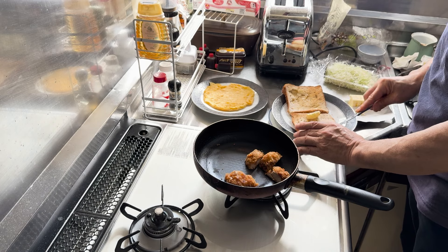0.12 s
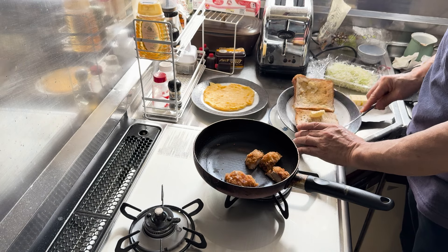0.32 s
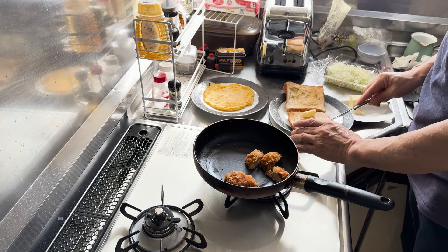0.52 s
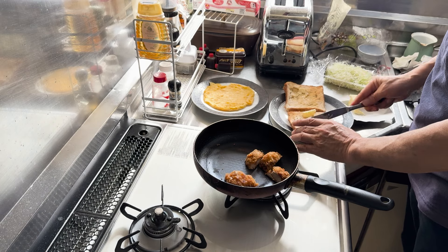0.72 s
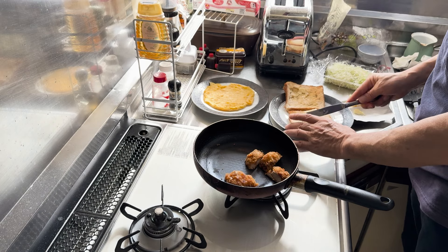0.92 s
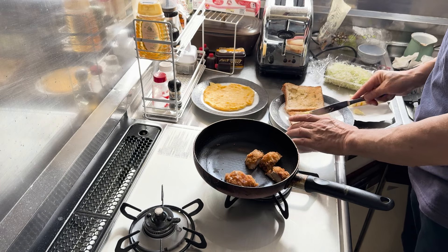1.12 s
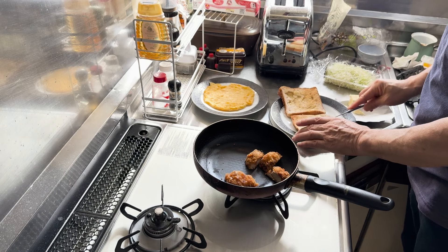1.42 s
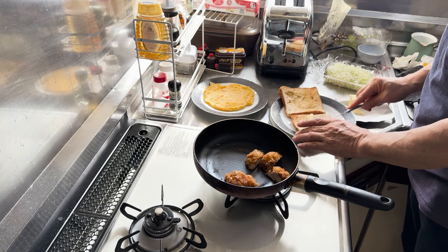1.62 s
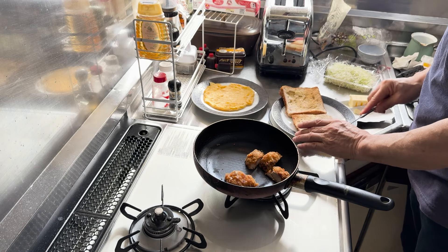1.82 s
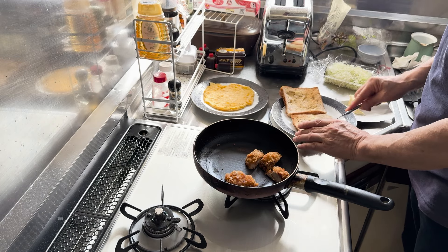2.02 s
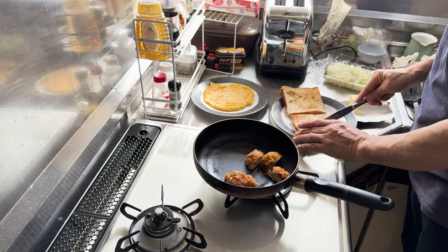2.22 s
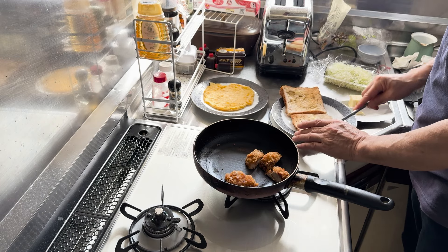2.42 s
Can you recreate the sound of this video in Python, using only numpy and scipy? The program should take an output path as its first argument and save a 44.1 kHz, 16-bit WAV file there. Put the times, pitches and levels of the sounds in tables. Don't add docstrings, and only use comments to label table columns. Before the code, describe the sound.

Crunchy knife cut through dry toast with a plate thud, followed by faint scratchy scrapes and taps

```python
import sys
import numpy as np
from scipy import signal
from scipy.fft import rfft, irfft, next_fast_len
from scipy.io import wavfile
from scipy.ndimage import uniform_filter1d

SR = 44100
rng = np.random.default_rng(int(sys.argv[2]) if len(sys.argv) > 2 else 0)


def wav_out(sig):
    wavfile.write(sys.argv[1], SR, np.round(np.clip(np.atleast_2d(sig).T, -1, 1) * 32767).astype(np.int16))


def volts_from_decibels(level):
    exponent = np.asarray(level, float) / 20
    return 10 ** exponent


N = 114660


def unit(x):
    return x / np.sqrt(np.mean(x ** 2) + 1e-30)


def curve(table, hz):
    a = np.array(table, float)
    return np.interp(np.log(hz + 1), np.log(a[:, 0] + 1), a[:, 1])


def add(out, x, start_s):
    i = max(int(start_s * SR), 0)
    out[i:i + len(x)] += x[:N - i]


def filtered(x, order, hz, kind="low"):
    return signal.lfilter(*signal.butter(order, hz, kind, fs=SR), x)


def peak(x, hz, q):
    return signal.lfilter(*signal.iirpeak(hz, q, fs=SR), x)


def ring(x, hz, t60_s):
    r = np.exp(-np.log(1000) / (max(t60_s, .002) * SR))
    w = 2 * np.pi * hz / SR
    return signal.lfilter([0, np.sin(w)], [1, -2 * r * np.cos(w), r * r], x)


def cracks(per_s, spread_db):
    on = rng.random(N) < per_s / SR
    sign = rng.choice([-1, 1], N)
    size_db = spread_db * np.minimum(rng.exponential(size=N), 3)
    return unit(on * sign * volts_from_decibels(size_db))


# (frequency [Hz], density [dB per Hz])
RUMBLE = [(15, -29), (25, -1.5), (87, -0.5), (190, -15.5), (317, -15), (450, -23.5), (4740, -47),
          (12500, -48.5), (16000, -76)]
# (frequency [Hz], level [dB])
MOTOR_LINES = [(245, -69), (295, -68)]


def hum():
    level_db, sway_db, sway_samples = -54.5, 2.0, 5000
    hz, t, out = np.fft.rfftfreq(N, 1 / SR), np.arange(N) / SR, 0
    for centre_hz in 30 * 2. ** np.arange(10):
        octaves = np.clip(np.log2((hz + 1) / centre_hz), -1, 1)
        shape = volts_from_decibels(curve(RUMBLE, hz)) * np.cos(np.pi / 2 * octaves)
        mid, side = irfft(rfft(rng.standard_normal((2, N))) * shape, N)
        drift = uniform_filter1d(rng.standard_normal(N), size=sway_samples)
        drift = uniform_filter1d(drift, size=sway_samples)
        width = min(centre_hz / 600, 1)
        out = out + volts_from_decibels(sway_db * unit(drift)) * (mid + width * side * np.array([[1], [-1]]))
    lines = sum(volts_from_decibels(db) * np.sqrt(2) * np.sin(2 * np.pi * f * t) for f, db in MOTOR_LINES)
    return volts_from_decibels(level_db) * unit(out) + lines


# (time [s], rise [s], hold [s], fall [s], level [dB])
DRAGS = [(0., 0.00071, 0.09, 0.052, -63), (0.11, 0.038, 0.05, 0.079, -55),
         (0.845, 0.012, 0.073, 0.019, -66.5), (0.989, 0.035, 0.024, 0.045, -65),
         (1.073, 0.073, 0.064, 0.066, -61.5), (1.343, .003, 0.09, 0.0095, -56.5),
         (1.605, 0.0047, 0.0091, 0.0073, -69), (1.687, .05, 0.013, .02, -59),
         (1.747, 0.0047, 0.013, 0.029, -42.5), (2.432, 0.043, 0.028, 0.013, -56),
         (2.589, 0.0091, 0.021, 0.013, -59.5)]
# (frequency [Hz], width [Hz], level [dB])
EDGE_MODES = [(3660, 70, -0.5), (6000, 200, -4), (6900, 180, -8.5), (8200, 160, -5.5), (12700, 170, 0),
              (13700, 180, -13)]


def scrapes():
    per_s, spread_db, rough_db, low_hz = 30000, 2, 1.2, 3000
    t, env = np.arange(N) / SR, np.zeros(N)
    for s, rise, hold, fall, db in DRAGS:
        swell = np.clip((t - s) / rise, 0, 1) ** 2
        env += volts_from_decibels(db) * swell * np.exp(-np.maximum(t - s - rise - hold, 0) / fall)
    rough = volts_from_decibels(rough_db * unit(uniform_filter1d(rng.standard_normal(N), size=400)))
    x = cracks(per_s, spread_db) * env * rough
    edge = sum(volts_from_decibels(db) * peak(x, f, f / width) for f, width, db in EDGE_MODES)
    return 0.96 * filtered(x, 1, low_hz, "high") + 0.13 * x + edge


# (time [s], level [dB], push [s])
BUMPS = [(0., -43, 0.0049), (0.089, -46, 0.0078), (0.234, -28, 0.00028), (0.279, -32, 0.00047),
         (0.284, -32.5, 0.0016), (.291, -27.5, 0.0012), (0.307, -19, 0.0013), (.352, -26, 0.0009),
         (0.372, -35.5, 0.00075), (1.334, -23, 0.021), (1.363, -34.5, 0.01), (1.403, -38.5, 0.0069),
         (1.543, -43.5, 0.003), (1.667, -32.5, 0.0079), (1.743, -40.5, 0.0028), (1.868, -35.5, 0.0043),
         (1.932, -36.5, 0.007), (2.074, -48, 0.002), (2.409, -32.5, 0.01), (2.442, -41.5, 0.0027),
         (2.559, -35, 0.0096)]
# (frequency [Hz], level [dB], t60 [s])
COUNTER_MODES = [(46.3, -20.5, 0.11), (59.9, -11.5, 0.14), (98, -4, 0.037), (156.2, 1, 0.13),
                 (189.4, -6, 0.14), (249.7, -6, 0.16), (273.8, -8.5, 0.26), (376, -7, 0.31),
                 (476.5, 1, 0.038)]


def thuds():
    shudder_s, shudder_db, shudder_fall_s, shudder_bass_db = 0.59, -73, 0.2, 16
    out = np.zeros(N)
    share = rng.standard_normal((len(BUMPS), len(COUNTER_MODES)))
    t = np.arange(SR // 2) / SR
    for (s, db, push_s), strike in zip(BUMPS, share):
        push = np.sin(np.pi * np.clip(t / push_s, 0, 1)) ** 2 / (push_s * SR / 2)
        modes = sum(volts_from_decibels(d + 2 * k) * ring(push, f, t60) for (f, d, t60), k in zip(COUNTER_MODES, strike))
        add(out, volts_from_decibels(db) * modes, s)
    t = np.arange(N) / SR - shudder_s
    x = rng.standard_normal(N) * (t > 0) * np.exp(-t / shudder_fall_s) * volts_from_decibels(shudder_db)
    return out + sum(volts_from_decibels(d + shudder_bass_db * (f < 120)) * ring(x, f, t60) for f, d, t60 in COUNTER_MODES)


# (time [s], length [s], frequency [Hz], level [dB])
LIGHT_RUBS = [(0.01, .06, 4500, -72), (1.0, .05, 1450, -63), (1.01, .055, 890, -56), (1.01, .05, 400, -60),
              (1.02, .05, 8100, -73), (1.02, .05, 6100, -71), (1.03, .04, 1200, -61),
              (1.12, .15, 8210, -66), (1.12, .14, 12100, -70), (1.12, .13, 7350, -71),
              (1.12, .13, 6120, -70), (1.13, .12, 3360, -70), (1.145, .11, 1870, -61),
              (1.195, .065, 1600, -57), (1.195, .06, 1320, -63), (1.195, .05, 2150, -64),
              (1.66, .05, 460, -52), (1.73, .07, 500, -58), (2.07, .13, 148, -52), (2.43, .05, 440, -55)]


def rubs():
    t60_s = .05
    t, noise, out = np.arange(N) / SR, rng.standard_normal(N), np.zeros(N)
    for s, length_s, hz, db in LIGHT_RUBS:
        swell = np.sin(np.pi * np.clip((t - s) / length_s, 0, 1)) ** .5
        out += volts_from_decibels(db) * unit(ring(noise, hz, t60_s)) * swell
    return out


# (time [s], level [dB], rise [s], fall [s], dull above [Hz])
PRESSES = [(0.219, -44, 0.0046, 0.0037, 5000), (0.226, -22, 0.0046, 0.016, 10500),
           (0.246, -29.5, 0.0012, 0.043, 7000), (0.271, -26.5, 0.0015, 0.06, 10500),
           (0.331, -7.5, 0.0039, 0.018, 12000), (0.344, -18, 0.0023, 0.0066, 1800),
           (0.354, -20.5, 0.0017, 0.011, 6027), (0.37, -22.5, 0.0021, 0.017, 4000),
           (0.4, -18.5, 0.0041, 0.021, 8000), (0.421, -22, 0.005, 0.024, 7000),
           (0.449, -55.5, 0.005, 0.03, 4000), (0.582, -60, 0.035, 0.26, 2000),
           (0.871, -59.5, .01, .03, 1500), (0.998, -55, 0.021, 0.088, 990), (1.19, -58, 0.01, 0.068, 2320),
           (1.346, -53, 0.0056, 0.046, 5070), (1.534, -55, 0.0037, 0.022, 2000),
           (1.656, -40.5, 0.01, 0.029, 2850), (1.684, -68.5, 0.0032, 0.024, 2586),
           (1.732, -53, 0.0033, 0.069, 2000), (1.845, -36.5, 0.002, 0.011, 2470),
           (1.858, -31, 0.0064, 0.022, 3460), (2.058, -43.5, 0.0042, 0.025, 2520),
           (2.383, -66.5, 0.004, 0.045, 1487), (2.422, -42.5, 0.0082, 0.025, 3000),
           (2.517, -47, 0.0036, 0.022, 1727), (2.575, -62, 0.0088, 0.016, 1163)]
# (frequency [Hz], width [Hz], level [dB])
TOAST_MODES = [(450, 50, 0), (1204, 490, 5.5), (1856, 160, -0.5), (3260, 230, 3.5), (3640, 130, -9.5),
               (6360, 110, -10)]
# (frequency [Hz], level [dB])
STEEL_MODES = [(3200, -10), (4540, -10), (4960, -11), (5790, -11), (7210, -7), (8150, -2), (11400, -5),
               (12000, 2), (12500, -2), (13100, 0)]


def knocks():
    cracks_per_s, crack_spread_db = 4000, 2
    crust_q, crust_peak_db, crust_low_hz = 2.5, -28, 556
    blade_modes, blade_lo_hz, blade_hi_hz = 36, 2200, 13500
    blade_scatter_db, blade_t60_s, steel_t60_s = 3, .04, .04
    toast_db, blade_db, steel_db = -7, -17, -31.5
    grain, body, blade = cracks(cracks_per_s, crack_spread_db), np.zeros(N), np.zeros(N)
    t = np.arange(SR * 3 // 10) / SR
    for s, db, rise, fall, dull_hz in PRESSES:
        env = np.minimum(t / max(rise, 1e-4), 1) * np.exp(-np.maximum(t - rise, 0) / max(fall, 1e-3))
        x = np.resize(grain[int(s * SR):], len(t)) * env
        cut_hz = min(dull_hz, SR / 3)
        x = filtered(x, 2, cut_hz) * np.sqrt(SR / 2 / dull_hz) * volts_from_decibels(db)
        add(body, x + volts_from_decibels(crust_peak_db) * peak(x, cut_hz * 0.88, crust_q), s)
        mode_db = blade_scatter_db * rng.standard_normal(blade_modes)
        mode_hz = blade_lo_hz * (blade_hi_hz / blade_lo_hz) ** rng.random(blade_modes)
        add(blade, sum(volts_from_decibels(d) * ring(x, f, blade_t60_s) for d, f in zip(mode_db, mode_hz)) / 20, s)
    body = filtered(body, 1, 300, "high")
    toast = sum(volts_from_decibels(d) * peak(body, f, f / max(width, 60)) for f, width, d in TOAST_MODES)
    steel = sum(volts_from_decibels(d) * ring(body, f, steel_t60_s) for f, d in STEEL_MODES)
    crust = filtered(body, 2, crust_low_hz, "high")
    return 0.32 * crust + volts_from_decibels(toast_db) * toast + volts_from_decibels(blade_db) * blade + volts_from_decibels(steel_db) * steel


# (time [s], frequency [Hz], level [dB], t60 [s])
CLEAR_RINGS = [(0.278, 160, -28, 0.22), (.279, 261, -13, 0.075), (0.2852, 521, -14, 0.045),
               (0.292, 334, -16, 0.035), (0.297, 148.7, -15.5, 0.27), (.351, 245.1, -17, 0.11),
               (.371, 150, -18.5, 0.095), (0.228, 8400, -22, 0.027), (1.859, 8200, -35.5, .05),
               (1.859, 6840, -32, 0.046), (1.751, 12500, -47, .05), (1.865, 382, -34, 0.073),
               (0.233, 1227, -22.5, 0.09), (0.244, 1496, -18, 0.056), (0.341, 1810, -42, 0.037),
               (0.402, 2997, -18, .07), (1.022, 944, -54, 0.092), (1.20, 1630, -51, 0.13),
               (1.212, 1800, -52.5, 0.068), (2.43, 2570, -43.5, 0.08), (1.665, 878, -40, 0.057),
               (1.666, 1138, -42, 0.055), (1.667, 2290, -40.5, 0.13), (1.732, 1000, -42, 0.065),
               (2.063, 2240, -43.5, 0.079), (2.064, 760, -44.5, .08), (2.426, 902, -42.5, .06),
               (2.427, 1202, -48, 0.039), (2.52, 1780, -41.5, 0.037), (2.525, 632, -48, 0.065),
               (1.756, 3660, -43, 0.18), (1.863, 1743, -22, 0.028), (2.063, 1577, -40.5, 0.1),
               (2.425, 2000, -39.5, 0.047), (2.535, 1627, -49, 0.16)]


def rings():
    out, t = np.zeros(N), np.arange(SR // 2) / SR
    onset = np.minimum(t / 0.0013, 1)
    for s, hz, db, t60 in CLEAR_RINGS:
        add(out, volts_from_decibels(db) * ring(1. * (t == 0), hz, t60) * onset, s)
    return out


def nearby(x):
    fall_s, level_db, lo_hz, hi_hz = .018, -5.5, 1200, 6000
    t = np.arange(2048) / SR
    ir = filtered(rng.standard_normal(len(t)) * np.exp(-t / fall_s), 1, [lo_hz, hi_hz], "band")
    return volts_from_decibels(level_db) * signal.fftconvolve(x, ir / np.sqrt(np.sum(ir ** 2)))[:N]


# (frequency [Hz], t60 [s], level [dB], side share [ratio])
KITCHEN = [(59, 0.49, -8.5, 0.07), (123.65, 0.92, -4.5, 0.19), (267, 0.82, -5, 0.17), (453, 0.5, -1.5, 0.2),
           (1073.7, 0.74, -17, 0.4), (2000, 0.25, -12.5, 0.34), (4000, 0.58, -20, 0.76),
           (8000, 0.18, -9.5, .3), (13400, 0.4, -24, 0.26)]


def room(x):
    t, ir = np.arange(SR) / SR, 0
    for hz, t60, db, side_share in KITCHEN:
        sos = signal.butter(2, [hz / np.sqrt(2), hz * np.sqrt(2)], "band", fs=SR, output="sos")
        env = np.exp(-np.log(1000) * t / t60) * np.clip(t / 0.0013, 0, 1)
        pair = signal.sosfilt(sos, rng.standard_normal((2, SR))) * np.array([[1], [side_share]])
        ir = ir + volts_from_decibels(db) * pair * env / np.sqrt(np.sum(env ** 2))
    return signal.fftconvolve(x[None], ir, axes=1)[:, :N]


# (frequency [Hz], phase [rad])
PORT_PHASE_RAD = [(150, .15), (500, .18), (1200, .4), (2500, .8), (6000, .9), (9000, 1.5), (13000, 1.3)]
# (frequency [Hz], level [dB])
PORT_LEVEL_DB = [(40, -0.5), (150, 2), (500, 1.7), (4000, -4.5), (12000, 0)]


def ports(x):
    n = next_fast_len(N + 4096)
    hz = np.fft.rfftfreq(n, 1 / SR)
    half = volts_from_decibels(curve(PORT_LEVEL_DB, hz) / 2) * np.exp(.5j * curve(PORT_PHASE_RAD, hz))
    return irfft(rfft(x, n) * np.array([half, 1 / half]), n)[:, :N]


def scene():
    near = scrapes() + thuds() + rubs() + knocks() + rings()
    mid, side = room(near)
    spread = (side + nearby(near)) * np.array([[1], [-1]])
    return ports(near + mid) + spread + hum()


# (frequency [Hz], level [dB])
MIC_COLOUR = [(100, 1), (1000, 2.5), (5000, -3.5), (8300, -0.5), (12000, -1), (13500, 0.5), (15600, -5)]
# (low [Hz], high [Hz], level [dB])
DEAD_BANDS = [(9350, 10550, -26), (14400, 15100, -20)]


def microphone(dry):
    top_hz, low_hz = 16300, 42
    hz = np.linspace(0, SR / 2, 513)
    db = curve(MIC_COLOUR, hz)
    for lo, hi, d in DEAD_BANDS:
        db = db + d * np.clip(np.minimum(hz - lo, hi - hz) / 300 + .5, 0, 1)
    fir = signal.firwin2(513, hz, volts_from_decibels(db), fs=SR)
    x = signal.fftconvolve(np.tanh(dry), fir[None], axes=1)[:, 256:256 + N]
    x = signal.sosfilt(signal.ellip(8, .2, 70, top_hz, fs=SR, output="sos"), x)
    return filtered(x, 2, low_hz, "high")


def roll_off(x):
    return signal.sosfilt(signal.butter(12, 16820, fs=SR, output="sos"), x)


def record(dry):
    return roll_off(microphone(dry))


dry = scene()
out = record(dry)
wav_out(out)
```